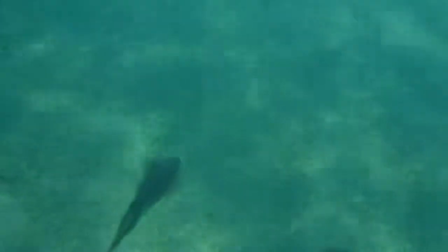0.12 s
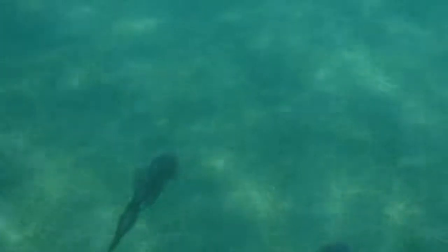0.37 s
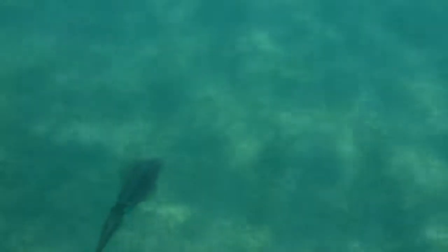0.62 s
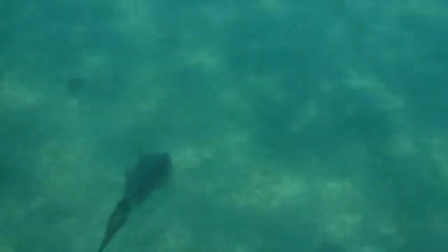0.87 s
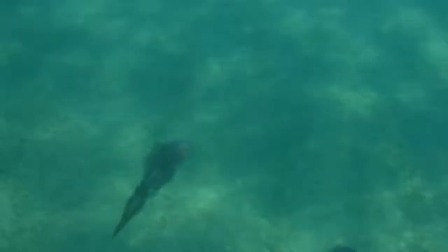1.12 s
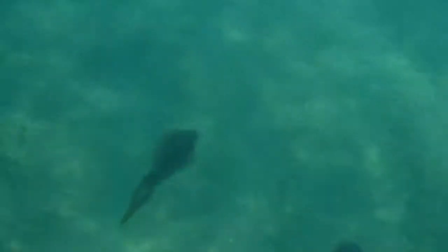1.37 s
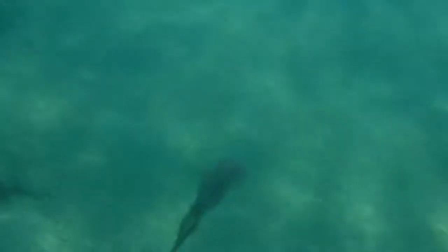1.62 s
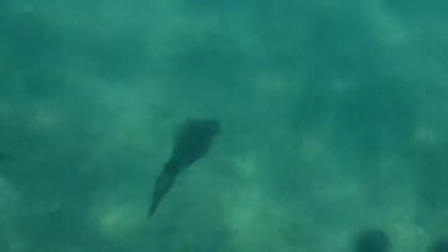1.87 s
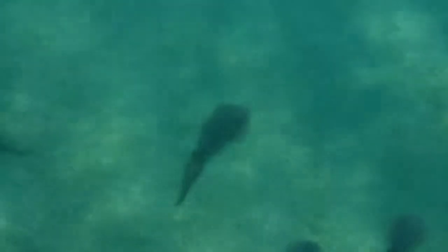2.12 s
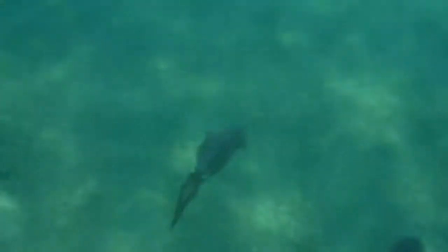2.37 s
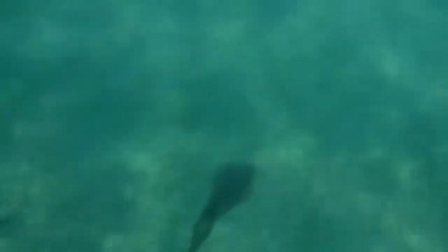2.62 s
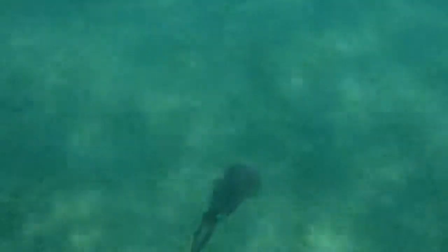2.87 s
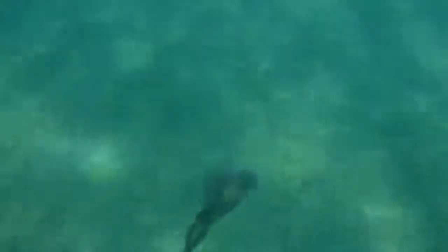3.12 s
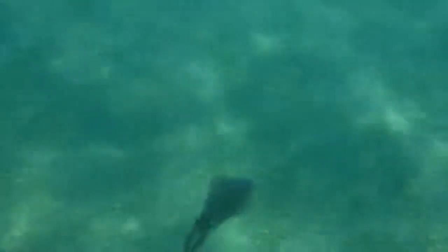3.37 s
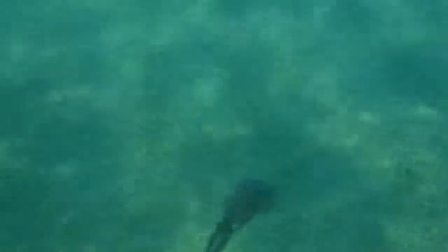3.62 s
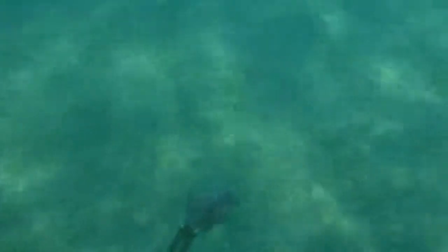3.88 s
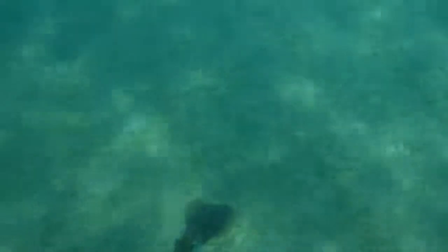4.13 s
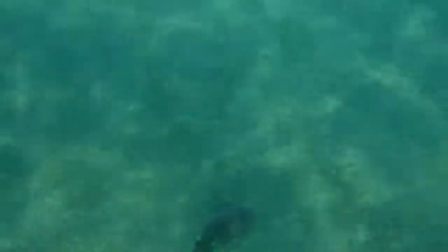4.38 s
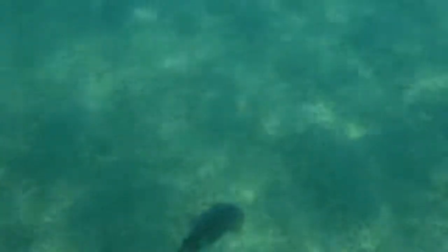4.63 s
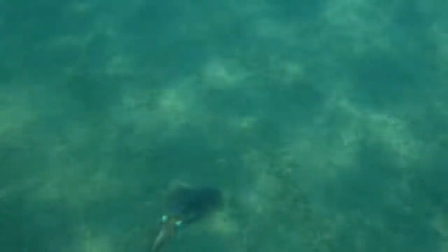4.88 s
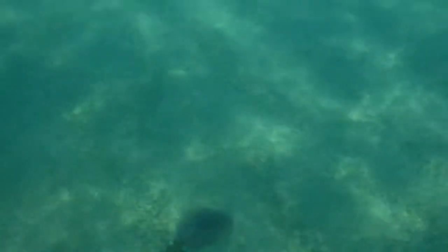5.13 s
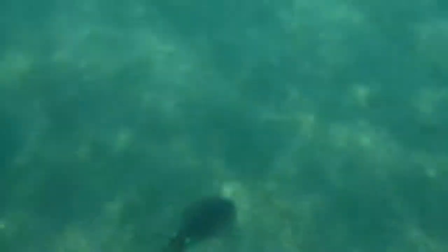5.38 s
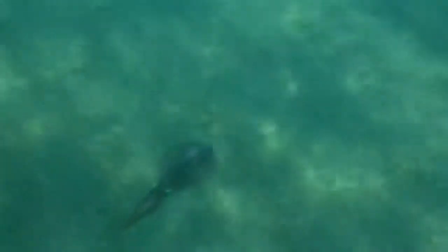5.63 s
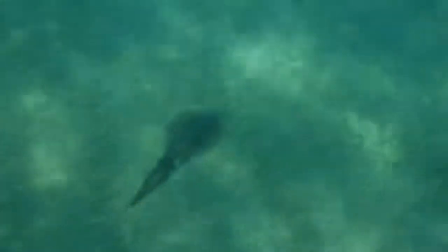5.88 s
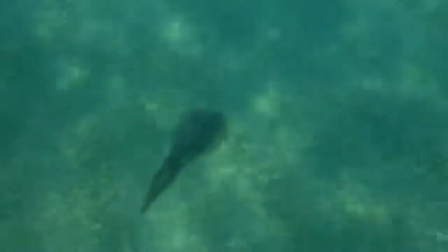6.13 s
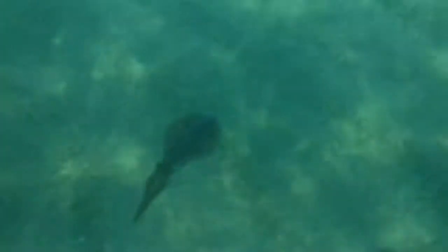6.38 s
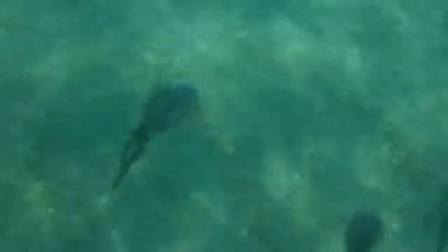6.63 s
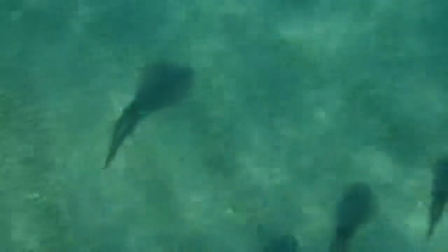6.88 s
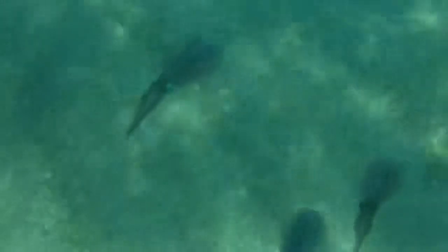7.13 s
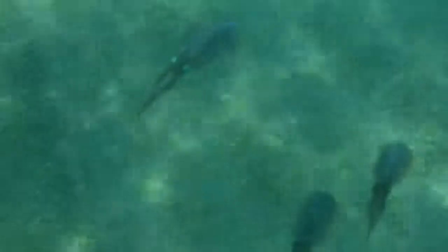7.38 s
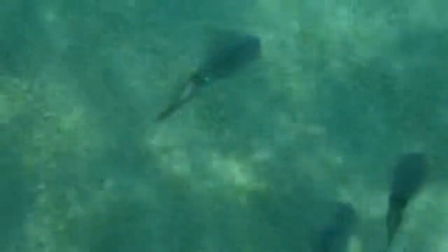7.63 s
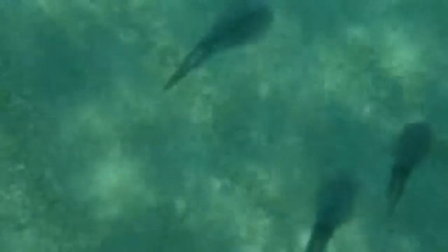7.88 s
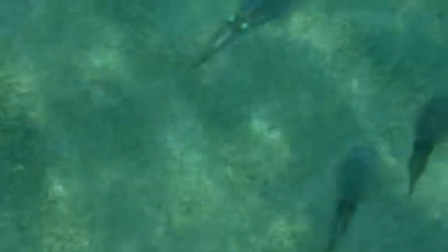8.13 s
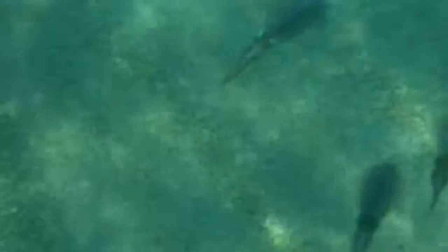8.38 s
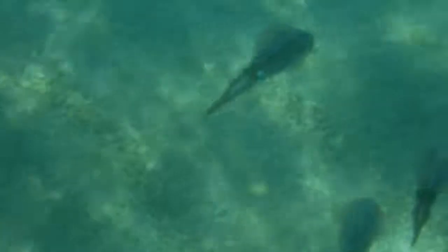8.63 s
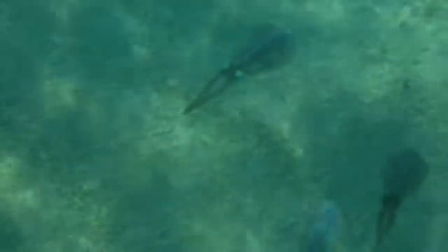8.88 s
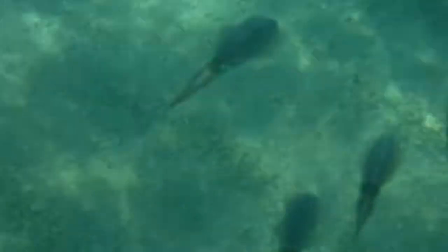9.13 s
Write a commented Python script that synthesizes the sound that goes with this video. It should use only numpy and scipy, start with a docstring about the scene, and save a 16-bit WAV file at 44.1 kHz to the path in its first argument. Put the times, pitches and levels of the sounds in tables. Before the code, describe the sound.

Dull submerged rumble and sparse tiny snaps, violent overloaded thumps against a plastic shell around five seconds, then thicker low gurgling towards the end.

```python
"""Camera housing under the sea surface

A camera drifts in a plastic housing. Bumps push its microphone, the hard ones into overload, and ring
the shell; short crackles of noise go with them, and something scrapes. A metal fitting ticks with dying
sines. Shrimp snap near and far: short bursts of noise that ring the microphone port. Trapped air gurgles
as dying sines of climbing pitch. Swell is a low rumble of shaped noise, over a muffled wash of noise.
"""
import sys
import numpy as np
from scipy import signal
from scipy.io import wavfile
from scipy.ndimage import uniform_filter1d

SR = 44100
rng = np.random.default_rng(int(sys.argv[2]) if len(sys.argv) > 2 else 0)


def to_linear_factor(level_db):
    """Convert decibel levels (scalar or array-like) to linear amplitude factors."""
    exponent = np.asarray(level_db, float) / 20
    return 10 ** exponent


def put_to_file(sound):
    """Save the sound as 16-bit audio at rate SR, in the file named by the first command-line argument."""
    columns = np.atleast_2d(sound).T  # one column per channel
    safe = np.clip(columns, -1, 1)
    whole_steps = np.round(safe * 32767)
    wavfile.write(sys.argv[1], SR, whole_steps.astype(np.int16))


N = 408366  # length in samples


def evened(x):
    """Scales a sound to rms 1."""
    return x / np.sqrt(np.mean(x ** 2) + 1e-20)


def add(mix, s, sound):
    """Mixes a sound in at time s, in seconds."""
    part = mix[round(s * SR):][:len(sound)]
    part += sound[:len(part)]


def bumps():
    """Leans, blows and faint nudges of the water push the microphone and ring the low modes of the shell."""
    # knocks, bounces, light taps and slow pushes on the shell: t/s, blow/dB, fall width/ms,
    # side struck (+1 or -1), and for some a slow lean just before/dB
    shell_blows = [(-.003, 13.5, 0.88, 1, -26), (.0081, -10, 1.5, 1), (.045, -5.5, 0.63, 1),
                   (.057, -14, 0.79, 1), (0.064, -13, 0.65, 1), (.452, -33, 0.45, 1), (.521, -30, 0.44, -1),
                   (1.814, -31, 0.65, 1), (1.853, -29, 3.2, 1), (2.0251, -25, 0.29, 1),
                   (3.589, -29, 0.68, 1), (4.4135, -19, 5, -1), (4.4193, 4.7, 0.73, 1, -13),
                   (4.4236, -12.5, 1.33, 1), (4.431, -16, 1.8, 1, -23.5), (4.7634, -7, 1.3, -1),
                   (4.76492, 22.5, 0.37, 1, -12), (4.7772, -13, 0.58, 1, -25),
                   (5.0184, 26.7, 0.43, 1, -9.2), (5.0191, 22.6, 0.35, -1, -7.2),
                   (5.0283, -5.4, 1.5, 1, -9.8), (5.032, -11, 1.1, -1), (5.0626, -9.7, 2.5, 1),
                   (5.0682, 5.7, 0.63, -1, -13.4), (5.0766, -7.6, 1.84, 1, -10.7), (5.1137, -18.6, 0.6, 1),
                   (5.1159, -9.5, 0.69, 1), (5.138, -19, .8, -1), (5.1441, -2, 0.58, 1, -16),
                   (5.151, -18, 1.34, 1), (7.602, -29, 0.52, 1), (7.847, -32.5, 0.72, 1),
                   (8.9458, -30, 0.52, -1), (9.1106, -20.5, 0.49, -1, -20), (9.147, -22, 0.72, 1)]
    # low modes of the shell: f/Hz, level/dB, time to fall by 60 dB/s
    shell_modes = [(292, -7, 0.015), (76, -21.5, 0.032)]
    straight = 1.02  # share of the push that reaches the microphone without ringing
    lean_s, lean_ms = 0.0017, 3  # how long before the blow the lean comes, and its width
    light_db, rebound_s = -24, 0.0018  # short taps lighter than this spring back at once
    front = 0.7  # a push arrives faster than it leaves: rise width as a share of the fall width

    # each push: time in s, size, fall width in ms; first the random nudges of the water
    pushes = []
    for s, size, soft in rng.random((200, 3)):
        pushes.append((s * N / SR, 0.022 * (size - 0.5) ** 3, 1.6 + 2.4 * soft))
    for s, blow_db, ms, side, *lean_db in shell_blows:
        side = np.sign(side)
        for db in lean_db:
            pushes.append((s - lean_s, side * to_linear_factor(db), lean_ms))
        pushes.append((s, -side * to_linear_factor(blow_db), ms))
        if blow_db < light_db and ms < 1:
            pushes.append((s + rebound_s, side * to_linear_factor(blow_db), ms))

    t = np.arange(-SR // 20, N) / SR  # starts early, to hold a push just before time 0
    push = np.zeros(len(t))
    for s, size, ms in pushes:
        near = slice(*np.searchsorted(t, [s - 0.02, s + 0.02]))
        width = max(ms, 0.05) / 1000 * np.where(t[near] < s, front, 1)
        push[near] += size * np.exp(-0.5 * ((t[near] - s) / width) ** 2)

    out = straight * push
    for hz, db, t60 in shell_modes:
        step = 2 * np.pi * hz / SR
        r = to_linear_factor(-60 / (t60 * SR))  # what is left of the ring after one sample
        ring = signal.lfilter([0, step * np.sin(step)], [1, -2 * r * np.cos(step), r * r], push)
        out += to_linear_factor(db) * ring
    return out[-N:]


def crackles():
    """Short crackles of noise, sharp in front and peaked at one pitch, most at the onset of a knock."""
    # short crackles: t/s, level of the peaked part at the start/dB, decay/ms, peak f/Hz
    short_crackles = [(0.0421, -26, 1.1, 3300), (2.1815, -29, 1.4, 10000), (4.4181, -24, 0.35, 2500),
                      (5.0587, -43, 2.2, 2400), (5.067, -36.5, .5, 3300), (5.1133, -30, 1.3, 3400),
                      (5.1411, -29, 1.5, 3300)]
    low_hz = 800  # bottom of the broad noise
    sharpness, broad_db = 3, -5.5  # Q of the peak; level of the broad noise around it
    t = np.arange(600) / SR
    out = np.zeros(N)
    for s, db, ms, hz in short_crackles:
        burst = rng.standard_normal(len(t)) * np.exp(-t * 1000 / ms)
        broad = signal.lfilter(*signal.butter(2, [low_hz, 2 * hz], 'band', fs=SR), burst)
        peaked = signal.lfilter(*signal.iirpeak(hz, sharpness, fs=SR), broad)
        both = evened(peaked) + to_linear_factor(broad_db) * evened(broad)
        shorter = np.sqrt(ms * SR / 2000 / len(t))  # a shorter decay holds less energy
        add(out, s, to_linear_factor(db) * both * shorter)
    return out


def scrape():
    """Something slides on the shell: dull noise under a short bell-shaped stroke."""
    # the slide: t/s, rms level at the height of the stroke/dB, half length/s, top f/Hz
    s, db, half, hz = (9.105, -40, .016, 500)
    grit = signal.lfilter(*signal.butter(2, hz, fs=SR), rng.standard_normal(N))
    stroke = np.exp(-0.5 * ((np.arange(N) / SR - s) / half) ** 2)
    return to_linear_factor(db) * evened(grit) * stroke


def fitting():
    """A metal fitting ticks against the shell: one sharp crack, then thin metal modes dying away."""
    # modes of the fitting: f/Hz, level/dB, time to fall by 60 dB/s
    metal_modes = [(3340, 5, 0.047), (4840, -12, 0.28), (6000, -5, 0.092), (7160, -2, 0.081)]
    tick_s, crack_db, ring_db = 4.76423, -3.5, -48
    t = np.arange(SR // 5) / SR
    ring = np.zeros(len(t))
    for hz, db, t60 in metal_modes:
        ring += to_linear_factor(db - 60 * t / t60) * np.sin(2 * np.pi * hz * t)
    crack = -np.exp(-t / 0.00007) * np.cos(2 * np.pi * 8000 * t)
    out = np.zeros(N)
    add(out, tick_s, to_linear_factor(ring_db) * ring + to_linear_factor(crack_db) * crack)
    return out


def snap(dull_db, ms, vary_db):
    """A short burst with a scatter tail rings the microphone port, each mode a little differently; peak 1."""
    # modes of the microphone port: f/Hz, width/Hz, level/dB
    port_modes = [(1090, 270, 0.5), (1650, 370, 5), (2200, 600, 1.5), (3000, 380, 11), (4000, 420, 8),
                  (5040, 800, 8), (6550, 1500, 10.5), (10400, 2100, 12), (11940, 600, 6.5),
                  (14500, 2600, 0.5)]
    dull_hz = 5500  # dull_db acts on the modes below this
    t = np.arange(1200) / SR
    fade = np.exp(-(t * 1000 / ms) ** 2) + to_linear_factor(-16.5) * np.exp(-t / 0.0034)
    burst = rng.standard_normal(len(t)) * fade
    out = np.zeros(len(t))
    for (hz, width, db), vary in zip(port_modes, rng.standard_normal(len(port_modes))):
        r = np.exp(-np.pi * width / SR)
        mode = [1, 0, -1, 1, -2 * r * np.cos(2 * np.pi * hz / SR), r * r]
        # the wide upper modes filter twice, for deep valleys between them
        ring = signal.sosfilt([mode] * (1 + (hz > dull_hz)), burst)
        share = to_linear_factor(db + vary_db * vary + (hz < dull_hz) * dull_db)
        out += share * ring / np.linalg.norm(ring) * np.sqrt(width)
    return out / abs(out).max()


def shrimp():
    """Shrimp snap near at set times, over a crackle of faint far snaps at random times."""
    # near snaps: t/s, peak level/dB, port modes under 5.5 kHz against their usual share/dB
    near_snaps = [(0.0885, -36, -3), (0.488, -35.5, -30), (0.5355, -37.5, -30), (0.7755, -35, 3),
                  (0.8573, -30, 1), (0.905, -40, 8), (1.0715, -31, -35), (1.4681, -36.5, -9),
                  (1.5051, -38, -25), (1.6405, -35, -5), (1.859, -36.5, -30), (2.022, -10.5, 4),
                  (2.1808, -24, 16), (2.213, -35, -4), (2.3094, -41, 12), (2.3546, -35, -9),
                  (3.0916, -35.5, -16), (3.855, -32, -7), (3.903, -25, -12), (3.9714, -22, -16),
                  (4.212, -37, 5), (4.307, -38, -2), (4.694, -29, -6), (5.252, -38, -2), (5.781, -30.5, -4),
                  (5.943, -39, -35), (6.162, -37, -17), (6.3056, -39, 21), (6.9213, -41, 3),
                  (7.2227, -37, -4), (7.302, -30.5, -40), (7.5876, -38, -20), (8.9312, -23, -0.5),
                  (8.9547, -40, -20), (9.005, -30.5, -31)]
    near_vary_db, far_vary_db = -1.5, 7  # how much the port modes differ from snap to snap
    # far snaps: faintest peak, range above it, most loss of low modes
    far_db, far_spread_db, far_dull_db = -55.5, 13.5, -11
    out = np.zeros(N)
    for s, db, dull_db in near_snaps:
        add(out, s + 0.0008, to_linear_factor(db) * snap(dull_db, 0.63, near_vary_db))
    for s, size, dull in rng.random((400, 3)):
        level = to_linear_factor(far_db + far_spread_db * size ** 2)
        add(out, s * N / SR, level * snap(far_dull_db * dull, 0.43, far_vary_db))
    return out


def control(size, order):
    """One column of the water table, drawn out to evenly spread times."""
    # water motion: t/s, churning near the housing/dB, escaping air/dB
    water_motion = [(0.12, -56, -73), (0.58, -56.5, -56), (0.72, -59.5, -53.5), (1.44, -57, -48.5),
                    (1.87, -58.5, -48), (2.26, -56.5, -46.5), (2.68, -60.5, -47), (2.76, -56, -50),
                    (3.06, -57.5, -54), (3.2, -61, -57), (3.45, -56, -45), (4.47, -56.5, -52),
                    (5.21, -54, -48), (5.36, -59, -56), (5.89, -61.5, -55), (5.95, -55.5, -58),
                    (6.39, -56.5, -48.5), (6.52, -61, -47), (7.5, -55.5, -49.5), (7.82, -59, -51.5),
                    (8.15, -55, -47), (8.5, -56, -41), (9.08, -57, -45.5), (9.26, -52.5, -39)]
    rows = np.transpose(water_motion)
    return np.interp(np.linspace(0, N / SR, size), rows[0], rows[order])


def churn(size):
    """Swings of the churning about its mean, in dB."""
    level_db = control(size, order=1)
    return level_db - level_db.mean()


def bubble(hz, t60, rise):
    """A soft start, then a dying sine whose pitch climbs as the bubble shrinks."""
    t60 = np.clip(t60, 0.015, 0.4)
    t = np.arange(0, t60, 1 / SR)
    # the pitch climbs by twice the share "rise" in all
    turns = hz * (t * (1 - rise / 2) + rise * t ** 2 / t60)
    soft_start = 1 - np.exp(-t / 0.0014)
    return np.sin(2 * np.pi * turns) * soft_start * to_linear_factor(-60 * (t / t60) ** 1.8)


def gurgle():
    """Trapped air: faint bubbles at random times, as loud as the escaping air, and loud ones at set times."""
    # loud bubbles: t/s, level/dB, f/Hz
    loud_bubbles = [(0.122, -33, 257), (0.517, -31.5, 288), (2.416, -33.5, 275), (2.491, -32, 216),
                    (2.553, -27, 247), (3.415, -38, 514), (3.496, -28, 271), (3.623, -30, 227),
                    (3.71, -31, 230), (3.911, -32.5, 278), (3.992, -29, 298), (7.295, -44, 1166),
                    (7.377, -35, 227), (7.888, -27, 268), (8.277, -25, 262), (8.315, -27.5, 300),
                    (8.476, -31, 278), (8.496, -25.5, 269), (8.595, -30, 294), (8.657, -30, 262),
                    (8.862, -30, 282), (9.148, -22, 188), (9.2, -27.5, 275)]
    loud_t60_s, loud_rise = 0.051, 0.078  # ring time at 270 Hz (shorter for higher bubbles); pitch climb
    faint = np.zeros(N)
    for s, pitch, length, strength, rise in rng.random((1400, 5)):
        offset = 2 * pitch - 1
        hz = 280 * 1.55 ** (offset * abs(offset) ** 0.5)
        t60 = 0.037 + 0.119 * length ** 2
        add(faint, s * N / SR, to_linear_factor(12.5 * strength ** 2) * bubble(hz, t60, 0.3 * rise))
    out = to_linear_factor(control(N, order=2)) * evened(faint)
    for s, db, hz in loud_bubbles:
        add(out, s, to_linear_factor(db) * bubble(hz, loud_t60_s * (270 / hz) ** 0.5, loud_rise))
    return out


def noise(points, size, swing_db, patchy_db):
    """Noise from random short-time spectra, patchy below 1.1 kHz; swing_db(hz, frames) moves its level."""
    frames, hz = 4 * N // size + 5, np.fft.rfftfreq(size, 1 / SR)
    a, b, patches = rng.standard_normal((frames, len(hz), 3)).T
    # smooth over pitch, then over time, so that the patches drift
    patches = uniform_filter1d(patches, size=4, axis=0)
    patches = evened(uniform_filter1d(patches, size=22, axis=1))
    f, db = np.transpose(points)
    shape_db = np.interp(np.log(hz + 1), np.log(f + 1), db, left=-80)[:, None]
    patch_db = patchy_db * (hz < 1100)[:, None] * patches
    z = (a + 1j * b) * to_linear_factor(shape_db + patch_db + swing_db(hz, frames))
    return signal.istft(z, nperseg=size, noverlap=3 * size // 4)[1][:N]


def surge():
    """Swell presses slowly on the housing: low noise that rises and falls with the churning."""
    # spectrum of the swell: f/Hz, relative level per Hz/dB
    swell_shape = [(8, 10), (16, 10.5), (30, 3), (55, -7.5), (100, -21.5), (140, -44), (250, -56.5)]
    level_db, follows = -36.5, 0.85  # mean level; share of the churning swings that the swell follows
    rumble = noise(swell_shape, size=8192, swing_db=lambda hz, n: 0, patchy_db=0.5)
    return to_linear_factor(level_db + follows * churn(N)) * evened(rumble)


def wash():
    """Distant surface noise, muffled by the shell, and microphone hiss, as one shaped noise."""
    # spectrum of the wash: f/Hz, relative level per Hz/dB
    wash_shape = [(80, -2.5), (160, -10.5), (290, -1.5), (430, -7), (560, -9.5), (660, -9.5), (790, -15),
                  (960, -12.5), (1230, -20.5), (1490, -10.5), (1750, -21), (2020, -27), (4000, -29),
                  (7900, -34), (10700, -31.5), (16000, -34)]
    level_db, follows = -50.5, 1.25  # rms level; share of the churning swings followed below 1.1 kHz

    def swing_db(hz, n):
        return follows * np.outer(hz < 1100, churn(n))

    return to_linear_factor(level_db) * evened(noise(wash_shape, size=1024, swing_db=swing_db, patchy_db=2.8))


def scene():
    """Everything at one microphone."""
    on_the_shell = bumps() + crackles() + scrape() + fitting()
    water = shrimp() + gurgle() + surge() + wash()
    return (on_the_shell + water)[None]


def top_cut(x):
    """Nothing passes above the cut-off."""
    return signal.sosfilt(signal.butter(12, 16620, fs=SR, output="sos"), x)


def record(dry):
    """The input clips and loses the top treble; the coupling capacitor after it makes the flat tops sag."""
    clipped = np.clip(dry, -0.78, 0.78)
    softened = signal.sosfilt(signal.butter(4, 15500, fs=SR, output='sos'), clipped)
    # the capacitor is a high-pass at 11 Hz
    coupled = signal.lfilter([1, -1], [1, -np.exp(-2 * np.pi * 11 / SR)], softened)
    return top_cut(coupled)


dry = scene()
out = record(dry)
put_to_file(out)
```